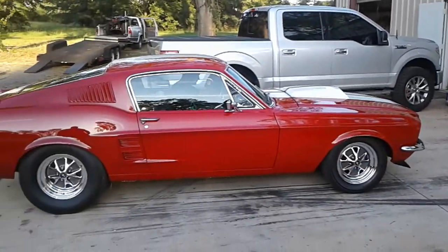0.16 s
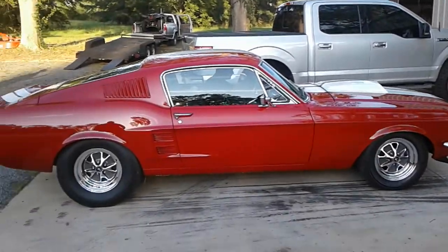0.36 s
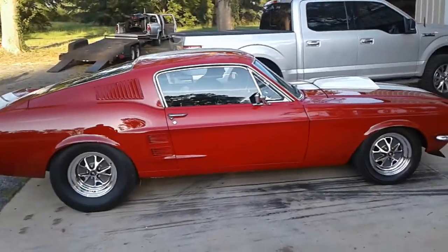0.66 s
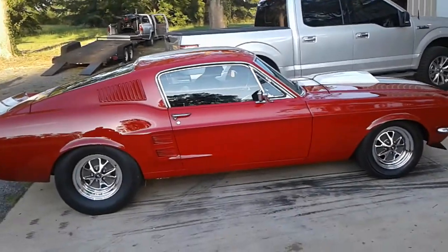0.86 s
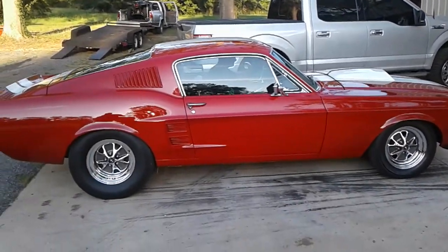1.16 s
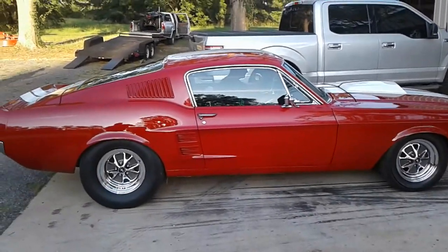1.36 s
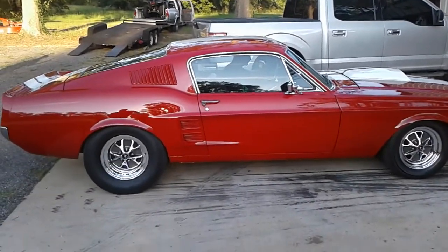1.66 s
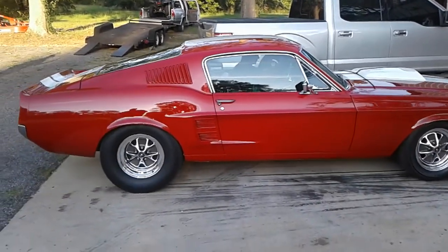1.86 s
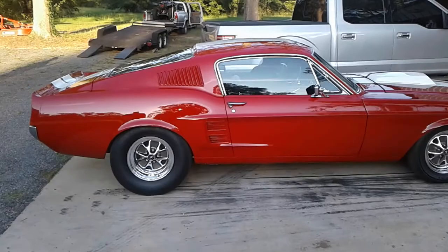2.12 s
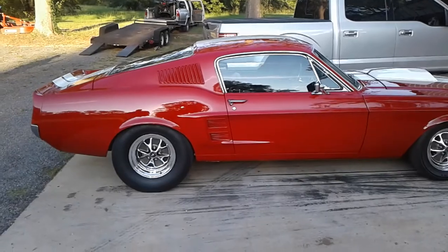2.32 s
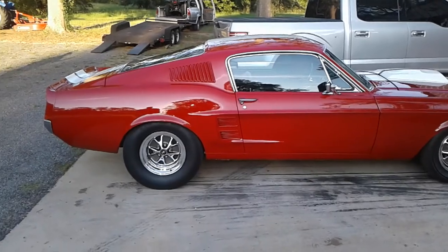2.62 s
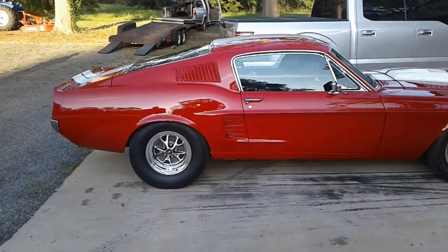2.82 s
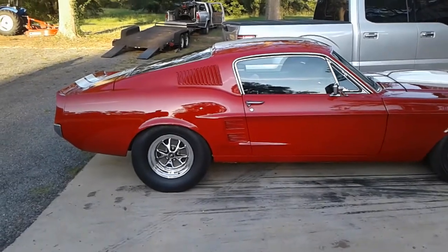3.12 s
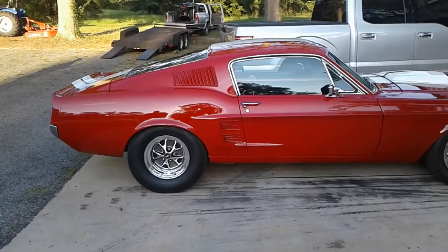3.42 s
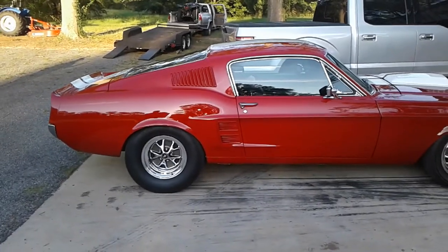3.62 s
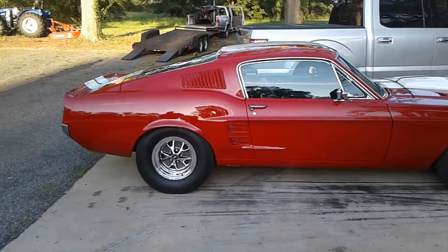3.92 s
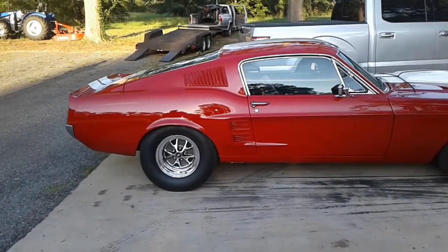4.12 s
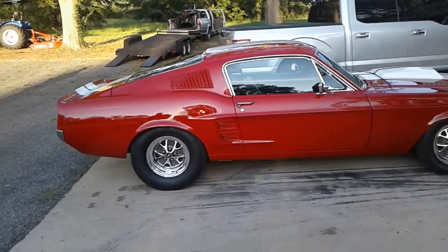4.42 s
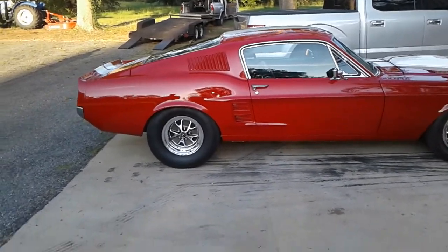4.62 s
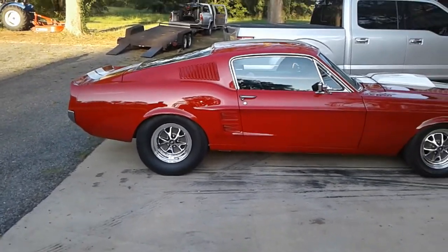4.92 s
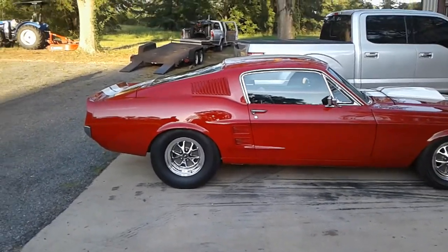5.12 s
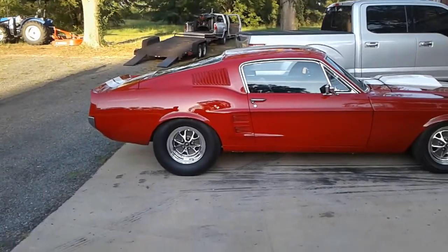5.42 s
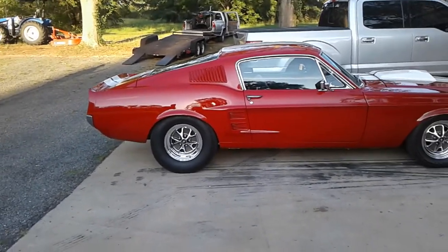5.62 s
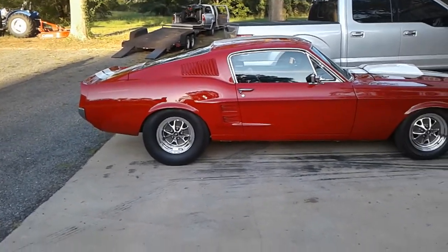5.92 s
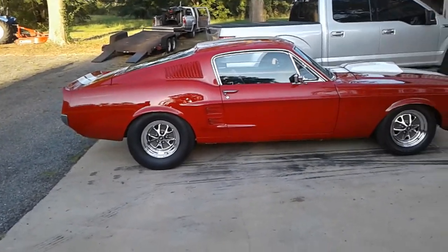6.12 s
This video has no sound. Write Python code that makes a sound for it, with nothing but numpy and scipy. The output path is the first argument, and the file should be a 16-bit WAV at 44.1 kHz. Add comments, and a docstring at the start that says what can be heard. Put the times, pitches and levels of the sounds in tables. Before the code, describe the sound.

Close to a car parked outdoors, a big V8 hums at a quick, even idle. A single stab of throttle sends the pitch climbing into a rasping roar, with crackling microphone distortion at the top. The engine then winds down and spends the remaining time in a lumpy, booming idle, its exhaust throbbing quickly and throwing out irregular hissing spits.

```python
"""A V8 with a big camshaft, heard from beside the car on a concrete apron, holds a smooth fast idle,
is revved once, coasts down on a closed throttle and falls into a loping idle: about twelve surges a
second, each a weak and a strong chug with a raspy spit. The periodic part of its firings is a hum;
the uneven part excites the pipe resonances as a boom. Turbulent gas adds rasp, roar and hiss, and
steep pressure fronts click. At the height of the rev the microphone overloads and crackles."""
import sys
import numpy as np
from scipy import signal
from scipy.fft import rfft, irfft, next_fast_len
from scipy.io import wavfile
from scipy.ndimage import uniform_filter1d, map_coordinates

SR = 44100
rng = np.random.default_rng(int(sys.argv[2]) if len(sys.argv) > 2 else 0)


def put_to_file(sound):
    """Save the sound as 16-bit audio at rate SR, in the file named by the first command-line argument."""
    columns = np.atleast_2d(sound).T  # one column per channel
    safe = np.clip(columns, -1, 1)
    whole_steps = np.round(safe * 32767)
    wavfile.write(sys.argv[1], SR, whole_steps.astype(np.int16))


N = 276507
TIME = np.arange(N) / SR

# engine speed: time_s, firing_rate_hz
FIRING_RATE = [(0, 99.4), (.72, 100.3), (.88, 109.4), (1.04, 179.7), (1.2, 239.9), (1.36, 282.4),
               (1.5, 295.6), (1.7, 293.4), (1.84, 242.3), (2.0, 198.7), (2.3, 112), (2.42, 94.9)]
# load and unevenness of the cylinders: time_s, throttle_fraction, unevenness_fraction
EFFORT = [(0, 0.29, 0.7), (.85, 0.55, 0.9), (.95, 0.99, 0.4), (1.3, 1, 0.82), (1.68, 0.97, 0.36),
          (1.78, 0.67, 0.02), (2.0, 0.19, .4), (2.2, 0.04, 0.78)]
# departure of each cylinder from the nominal pulse, in firing order: offset_fraction
CYLINDER_OFFSETS = np.array([0.16, -0.48, 0.23, -0.92, -0.56, 0.0064, -0.026, -0.62])
# hunting of the low idle: time_s, surge_rate_hz
SURGE_RATE = [(2.26, 12.1), (2.55, 12.85), (2.83, 11.46), (3.12, 13.2), (3.41, 10.57), (3.69, 11.71),
              (3.98, 11.21), (4.26, 12.65), (4.55, 10.97), (4.84, 10.38), (5.12, 10.66), (5.41, 14.71),
              (5.7, 12.41), (5.98, 11.06), (6.27, 11.46)]
# the weak and the strong blow-down of a surge: phase_cycles, strength_db
SURGE_BLOWS = [(0.168, -5), (0.552, -2)]
# hard blow-downs that stand out of the lope: start_s, boom_db, rasp_db, hiss_db
HARD_SPITS = [(2.265, -14, -7, 2), (2.3, -7, -1, -2), (2.357, -13, 1, -6), (2.538, -27, -2, 6),
              (2.69, -5, -22, -1), (2.91, 3, -10, 7), (3.035, -18, -16.5, -4), (3.36, -5, -10, -9),
              (3.545, -19, -8, -1.5), (3.715, -3, -6, -19), (4.066, -10, -15, 1), (4.147, -5, -15, -15),
              (4.31, -30, -1, 4), (4.399, -23, -10, -1), (4.46, -7, -20, -5), (4.541, -1, -7, -1),
              (4.812, -6, -0.5, -3), (4.96, -9, -3, -4), (4.997, -6, 4.5, 3), (5.138, -25, -3, -1),
              (5.826, -20, -5, -4)]
# envelope of the firing note: time_s, level_db
NOTE_LEVEL = [(0, -8.5), (.89, -2), (.96, -13.5), (1.03, -8.5), (1.15, -12), (1.3, -53), (1.7, -18.5),
              (1.85, -72)]
# beat of the two banks, strongest while coasting down: time_s, level_db
BEAT_LEVEL = [(.9, -50), (1.1, -30), (1.68, -34), (1.75, -6.5), (1.81, -23.5), (2.01, -6), (2.08, -24),
              (2.4, -69)]
# pipe response that weights the partials of the beat: frequency_hz, gain_db
BEAT_RESPONSE = [(40, -40), (75, -11), (98, 4.5), (118, -7), (140, -8), (172, .5), (200, -12.5),
                 (300, -24)]
# envelope of the boom: time_s, level_db
BOOM_LEVEL = [(0, -12.5), (.55, -16), (1.1, -23), (1.68, -29.5), (1.78, -10), (2.05, -23.5), (2.23, -25),
              (2.28, -10), (5.1, -10), (5.6, -7.5)]
# exhaust pipe resonances: pitch_hz, width_hz, gain_db
PIPE_MODES = [(82.6, 9.3, -14.5), (88.9, 17, -5.5), (108, 14.4, 0), (147.5, 16.7, -4.5), (222.5, 15, -13),
              (277.3, 26, -9.5)]
# the muffler passes only low notes: frequency_hz, gain_db
MUFFLER = [(20, -31), (45, -54), (65, 14), (240, 3.5), (320, -23), (450, -14), (1200, -73), (3000, -100)]
# envelopes of the gas noise: time_s, rasp_db, hiss_db
GAS_LEVELS = [(0, -26, -36.5), (.35, -28.5, -41), (.87, -28, -38), (.99, -20.5, -28.5), (1.05, -13.5, -23),
              (1.35, -11.5, -20), (1.64, -12, -24), (1.73, -18, -27.5), (2.0, -33.5, -40), (2.25, -31, -43),
              (2.29, -27, -37.5), (3.03, -25, -38.5), (3.18, -31, -41), (3.36, -25.5, -37.5),
              (5.35, -26, -36.5), (6.27, -24, -35.5)]
# rasp at light throttle: frequency_hz, gain_db
RASP_SPECTRUM = [(160, -53), (280, -28), (338, -10.5), (449, -14), (564, -9), (612, -10.5), (748, -1),
                 (980, -14.5), (1340, -5.5), (1430, -4.5), (2230, -1.5), (2450, -5), (3120, -7),
                 (5000, -25.5), (7000, -47), (9100, -38), (15400, -120)]
# ringing of pipes and muffler shells, relative to the broad rasp: pitch_hz, width_hz, gain_db
SHELL_MODES = [(558, 14, 2), (725, 20, -1), (847.5, 14, 5.5), (1280, 9, 0.5), (1507, 14, -7),
               (2294, 9.4, 4.5), (3030, 70, -20), (4180, 32, 2.5)]
# higher wall resonances rung by a spit: pitch_hz, width_hz, gain_db
SPIT_MODES = [(3120, 190, 0.5), (3630, 440, -2)]
# roar at open throttle: frequency_hz, gain_db
ROAR_SPECTRUM = [(25, -3), (100, -4), (200, 5), (400, -2.5), (1100, -2.5), (1500, -2), (2300, -4),
                 (3200, -11), (5000, -27), (8000, -13.5), (15000, -75)]
# low bark as the engine pulls up, relative to the broad roar: pitch_hz, width_hz, gain_db
BARK_MODES = [(550, 110, 1.5), (830, 420, -12.5), (1200, 240, -23), (2230, 280, -22)]
# scream at high speed, relative to the broad roar: pitch_hz, width_hz, gain_db
SCREAM_MODES = [(577, 39, -5), (1402, 68, 6.5), (1537, 39, 2), (1710, 30, 4), (1884, 21, 3),
                (2158, 39, 11.5), (2382, 28, 7.5), (2740, 55, 2)]
# hiss of the exhaust jet: frequency_hz, gain_db
HISS_SPECTRUM = [(2940, -44), (5000, -51.5), (6320, -11.5), (9190, 6.5), (9740, 3.5), (11700, -22.5),
                 (13200, -11), (15100, -3), (16000, -56)]
# clicks of the pressure fronts: frequency_hz, gain_db
CLICK_SPECTRUM = [(2500, -30), (4200, 6), (5800, -9), (9000, -5), (12000, -6), (15000, 4)]
# envelope of the overload crackle: time_s, level_db
CRACKLE_LEVEL = [(1.015, -53), (1.04, -6), (1.12, -13), (1.67, -13), (1.73, -44)]
# single cracks as the overload sets in and lets go: start_s, level_db
CRACKS = [(.982, -5.5), (1.007, -5), (1.019, -2), (1.026, -5), (1.033, -4), (1.699, -1), (1.713, -7),
          (1.753, -8)]
# colour of the crackle: frequency_hz, gain_db
CRACKLE_SPECTRUM = [(30, -1), (500, 5), (3000, 10), (8000, 3), (11000, -.5), (16000, -2.5)]

LOPE_START_S = SURGE_RATE[0][0]


def firings(count, unevenness, throttle, scatter_db=4.5, jitter_s=.0016, stumble=.3):
    """Uneven combustion varies the time and size of the exhaust pulse released at each whole count."""
    number = np.arange(1, int(count[-1]))
    times = np.interp(number, count, TIME)
    rough = np.interp(times, TIME, unevenness)
    size_draw, time_draw = rng.standard_normal((len(number), 2)).T
    sizes = 1 + rough * CYLINDER_OFFSETS[number % len(CYLINDER_OFFSETS)]
    sizes *= amp(scatter_db * rough * size_draw)
    # without load the crank speeds up and slows down from firing to firing
    slack = np.interp(times, TIME, 1 - throttle)
    drift = stumble * np.interp(times, TIME, wobble(22)) * np.gradient(times)
    return times + slack * rough * (jitter_s * time_draw + drift), sizes


def blowdowns(scatter_s=.004, scatter_db=3):
    """A hunting idle releases gas twice in each surge; gives the times and strengths in dB."""
    count = np.cumsum(curves(SURGE_RATE)[0] * (TIME > LOPE_START_S)) / SR
    phase, db = np.transpose(SURGE_BLOWS)
    surges = np.arange(int(count[-1]) + 1)
    marks = (surges[:, None] + phase).ravel()
    time_draw, size_draw = rng.standard_normal((len(marks), 2)).T
    times = np.interp(marks, count, TIME) + scatter_s * time_draw
    return times, np.tile(db, len(surges)) + scatter_db * size_draw


def hum(count, waver_db=1.76):
    """Periodic firing gives a harmonic note; lower harmonics of the engine cycle beat together."""
    note_db, beat_db, firing_hz = curves(NOTE_LEVEL)[0], curves(BEAT_LEVEL)[0], curves(FIRING_RATE)[0]
    cylinders = len(CYLINDER_OFFSETS)
    phase = 2 * np.pi * count
    tone = np.sin(phase) + amp(-35) * np.sin(3 * phase) + amp(-32.5) * np.sin(5 * phase)
    note = np.sqrt(2) * tone * amp(waver_db * wobble(25.7))
    beat = np.zeros(N)
    for order, db in enumerate([-17, 3.5, -1.5, -1.5], start=cylinders // 2 - 1):
        pipe_gain = gain_at(BEAT_RESPONSE, order * firing_hz / cylinders)
        beat += pipe_gain * np.sin(order * phase / cylinders) * amp(db + wobble(23.16))
    return amp(note_db) * note + amp(beat_db) * unit_rms(beat, .068)


def boom(times, sizes, strength, cutoff_hz=52):
    """Uneven pulses excite the pipe resonances; a narrow tailpipe cannot radiate the deepest bass."""
    # before the lope, what all firings share is heard as the hum instead
    shared = times < LOPE_START_S
    pulses = impulses(times, sizes - shared)
    ringing = filtered(pulses, lambda hz: resonances(PIPE_MODES, hz) * gain_at(MUFFLER, hz))
    chugs = amp(curves(BOOM_LEVEL)[0]) * unit_rms(ringing, .036) * strength
    return filtered(chugs, lambda hz: hz ** 4 / np.hypot(hz ** 4, cutoff_hz ** 4))


def lope(blows, hard_db, weak_db=-3, chug_s=.031, edge_s=.0114):
    """Amplitude modulation: at low idle the cylinders burn well only briefly at each blow-down."""
    def runs(times, db):
        return uniform_filter1d(impulses(times + chug_s / 2, amp(db)), int(chug_s * SR)) * chug_s * SR
    strength = amp(weak_db) + runs(*blows) + runs(np.transpose(HARD_SPITS)[0], hard_db)
    strength = np.where(TIME < LOPE_START_S, 1, strength / (1 + amp(weak_db)))
    return uniform_filter1d(strength, int(edge_s * SR) + 1)


def puffs(times, sizes, decay_s, steady_flow=3.8):
    """Turbulence makes broadband noise, which swells with the puff of gas from each firing."""
    flow = decays(times, sizes, decay_s, length=SR // 30)
    return rng.standard_normal(N) * (steady_flow + unit_rms(flow, .44))


def rasp(times, sizes, throttle, pulse_db=-7.5):
    """Gas noise forces the pipe walls to ring; under load, steep pressure fronts join in as a roar."""
    def ring(x, spectrum, modes):
        return filtered(x, lambda hz: gain_at(spectrum, hz) * (1 + resonances(modes, hz)))
    gas = puffs(times, sizes, decay_s=.0059)
    light = unit_rms(ring(gas, RASP_SPECTRUM, SHELL_MODES), .1)
    fronts = unit_rms(gas, .14) + amp(pulse_db) * unit_rms(impulses(times, sizes), .07)
    bark = unit_rms(ring(fronts, ROAR_SPECTRUM, BARK_MODES), .048)
    scream = unit_rms(ring(fronts, ROAR_SPECTRUM, SCREAM_MODES), .048)
    fast = np.interp(curves(FIRING_RATE)[0], [190, 260], [0, 1])
    roar = (1 - fast) * bark + fast * scream
    return np.sqrt(1 - throttle) * light + np.sqrt(throttle) * roar


def spits(blows, hard_db, between_db, rise_s, decay_s, kicks=0):
    """Transient flow: the relative gas speed flares at each blow-down and decays exponentially."""
    times, db = blows
    t = np.arange(SR // 5) / SR
    shape = (1 - np.exp(-t / rise_s)) ** 2 * np.exp(-t / decay_s)
    starts = impulses(times, amp(db)) + impulses(np.transpose(HARD_SPITS)[0], amp(hard_db)) + kicks
    flares = signal.fftconvolve(starts, shape / shape.max())[:N]
    return unit_rms(amp(between_db) + flares, .5)


def brightened(x, gas_speed):
    """Flow noise grows louder and brighter with gas speed, and duller between spits."""
    walls = filtered(x, lambda hz: resonances(SPIT_MODES, hz))
    return gas_speed * (x + (gas_speed - 1) * walls)


def hiss(times, sizes, throttle, blows, hard_db):
    """The turbulent jet hisses; fronts steepen into clicks under throttle or at the top of a spit."""
    jet = filtered(puffs(times, sizes, decay_s=.0061), lambda hz: gain_at(HISS_SPECTRUM, hz))
    gas_speed = spits(blows, hard_db, between_db=-5.5, rise_s=.0022, decay_s=.013, kicks=ticks())
    steepness = throttle + np.clip(gas_speed - 1, 0, 1)
    return gas_speed * (unit_rms(jet, .2) + steepness * amp(-9) * clicks(times))


def clicks(times, spread_db=5, decay_s=.002):
    """A steep pressure front leaves the pipe as a click, a few much louder than the rest."""
    sizes = amp(spread_db * np.clip(rng.standard_normal(len(times)), -2, 2))
    bursts = decays(times, sizes, decay_s, length=SR // 50) * rng.standard_normal(N)
    clatter = filtered(bursts, lambda hz: gain_at(CLICK_SPECTRUM, hz))
    return clatter / clatter.std()


def ticks(start_s=2.287, rate_hz=26.55, strength_db=-5, scatter_db=6):
    """A periodic train of uneven impulses, heard as a tick in the hiss of the low idle."""
    times = np.arange(start_s, N / SR, 1 / rate_hz)
    return impulses(times, amp(strength_db + scatter_db * rng.standard_normal(len(times))))


def crackle(rate_hz=700, spread_db=7):
    """Driven past its linear range, the microphone breaks up in short broadband bursts."""
    time_draw, size_draw = rng.random((int(rate_hz * N / SR), 2)).T
    dense = decays(time_draw * N / SR, amp(spread_db * size_draw), decay_s=.00053, length=SR // 100)
    crack_times, crack_db = np.transpose(CRACKS)
    single = decays(crack_times, amp(crack_db), decay_s=.00061, length=SR // 100)
    envelope = amp(curves(CRACKLE_LEVEL)[0]) * unit_rms(dense, .11) + single
    return filtered(envelope * rng.standard_normal(N), lambda hz: gain_at(CRACKLE_SPECTRUM, hz))


def amp(db):
    """Amplitude ratio of a level in decibels."""
    return 10 ** (np.asarray(db) / 20)


def curves(rows):
    """Linear interpolation of each column after the time, one value per sample."""
    times, *columns = np.transpose(rows)
    return [np.interp(TIME, times, column) for column in columns]


def wobble(rate_hz):
    """Slow random fluctuation: a spline through rate_hz knots a second."""
    return map_coordinates(rng.standard_normal(int(N * rate_hz / SR) + 4), [TIME * rate_hz])


def unit_rms(x, window_s):
    """Normalisation of x by its running rms."""
    size = int(window_s * SR / 2) + 1
    power = uniform_filter1d(uniform_filter1d(x * x, size), size)
    return x / np.sqrt(np.abs(power) + 1e-14)


def filtered(x, response):
    """Linear filtering: the spectrum of x times a frequency response."""
    size = next_fast_len(N + SR // 2)
    return irfft(rfft(x, size) * response(np.fft.rfftfreq(size, 1 / SR)), size)[:N]


def gain_at(points, hz):
    """Magnitude response interpolated on a logarithmic frequency axis."""
    frequency_hz, gain_db = np.transpose(points)
    return amp(np.interp(np.log(hz + 1), np.log(frequency_hz + 1), gain_db))


def resonances(modes, hz):
    """Superposition of the complex responses of damped modes."""
    return sum(amp(db) * 1j * hz * width / (pitch * pitch - hz * hz + 1j * hz * width)
               for pitch, width, db in modes)


def impulses(times, sizes):
    """Impulse train, each impulse shared between its two nearest samples."""
    at = np.clip(times * SR, 0, N - 2)
    i = at.astype(int)
    return np.bincount(i, sizes * (1 - at + i), N) + np.bincount(i + 1, sizes * (at - i), N)


def decays(times, sizes, decay_s, length):
    """Convolution of impulses with an exponential decay, length samples long."""
    t = np.arange(length) / SR
    return signal.fftconvolve(impulses(times, sizes), np.exp(-t / decay_s))[:N]


def scene():
    """Superposition of hum, boom, rasp and hiss, all driven by the same firings, and the crackle."""
    rasp_db, hiss_db = curves(GAS_LEVELS)
    throttle, unevenness = np.clip(curves(EFFORT), 0, 1)
    _, hard_boom_db, hard_rasp_db, hard_hiss_db = np.transpose(HARD_SPITS)
    blows = blowdowns()
    firing_count = np.cumsum(curves(FIRING_RATE)[0]) / SR
    times, sizes = firings(firing_count, unevenness, throttle)
    low = hum(firing_count) + boom(times, sizes, lope(blows, hard_boom_db))
    mid = amp(rasp_db + 3.3 * throttle ** 2) * rasp(times, sizes, throttle)
    mid = brightened(mid, spits(blows, hard_rasp_db, between_db=-.5, rise_s=.0059, decay_s=.024))
    # the hiss falls behind the roar as the throttle opens
    high = amp(hiss_db - 6.1 * throttle ** 2) * hiss(times, sizes, throttle, blows, hard_hiss_db)
    return (low + mid + high + crackle())[None]


def record(dry):
    """Saturation in the microphone flattens loud peaks; a band limit removes the highest treble."""
    ceiling, knee, top_hz = .82, 7.5, 15900
    saturated = dry[0] / (1 + np.abs(dry[0] / ceiling) ** knee) ** (1 / knee)
    return filtered(saturated, lambda hz: hz < top_hz)[None]


dry = scene()
out = record(dry)
put_to_file(out)
```